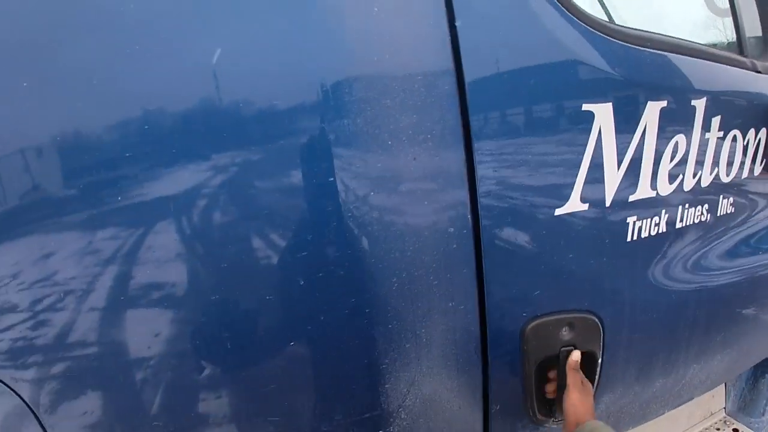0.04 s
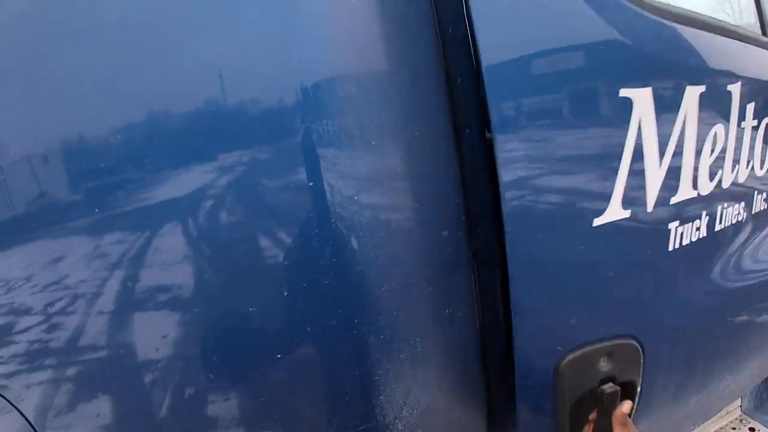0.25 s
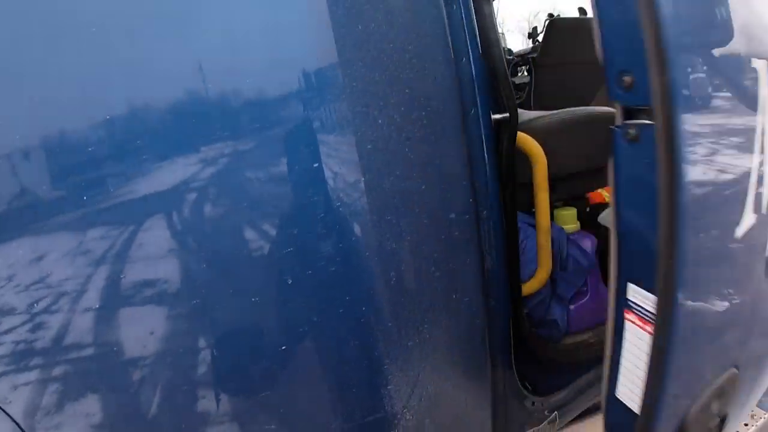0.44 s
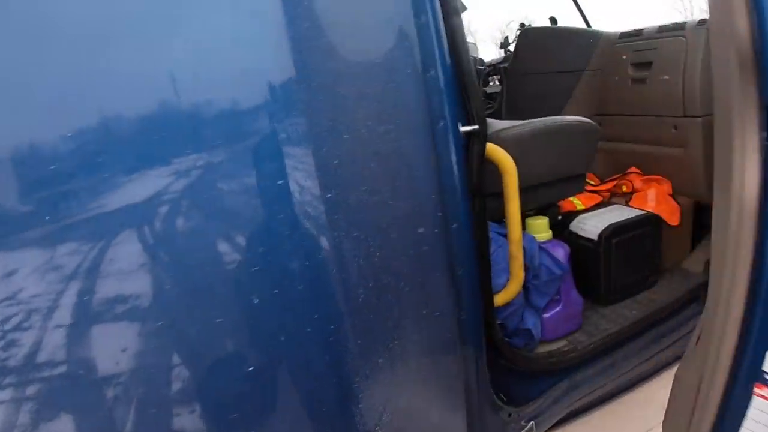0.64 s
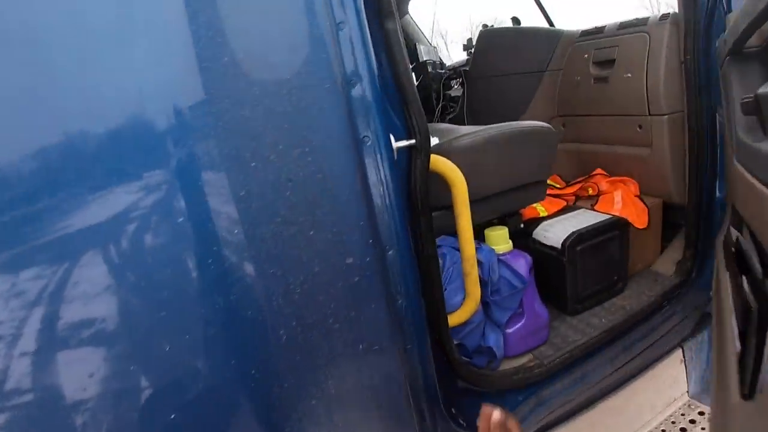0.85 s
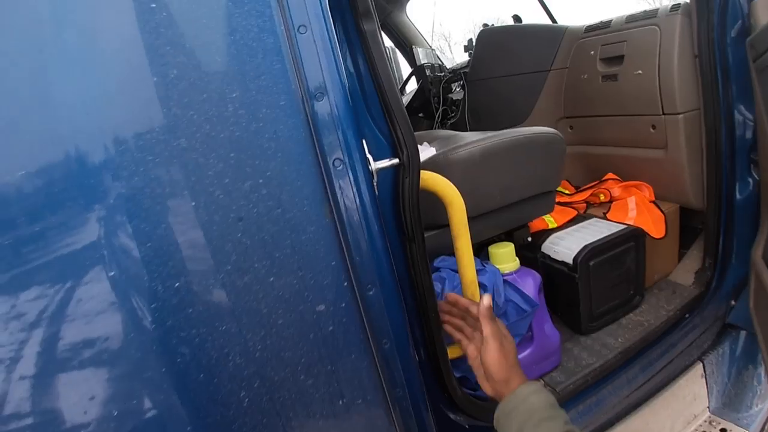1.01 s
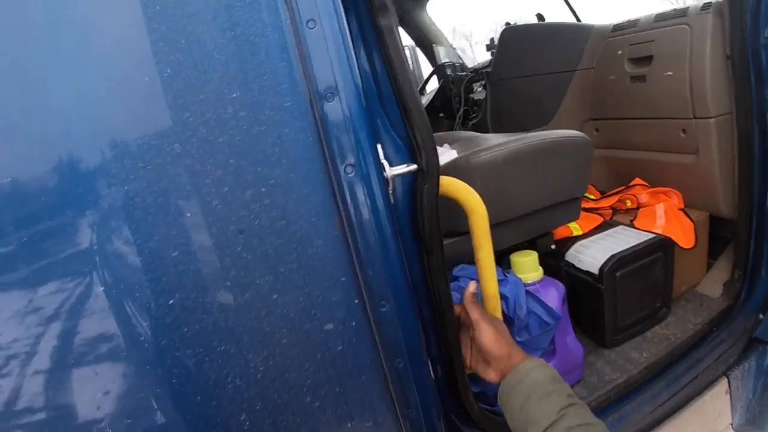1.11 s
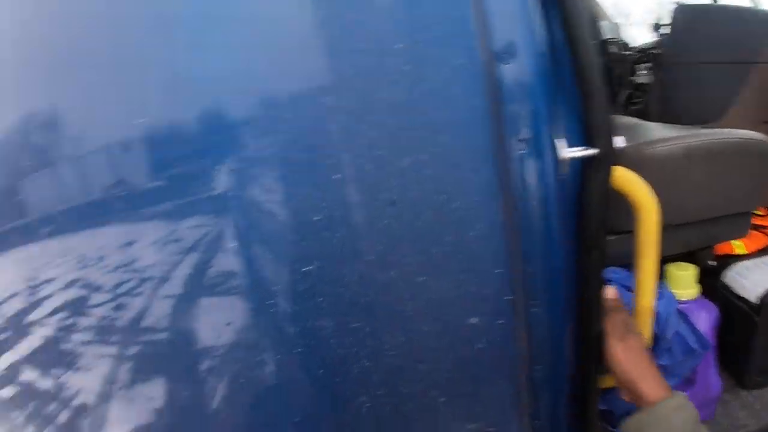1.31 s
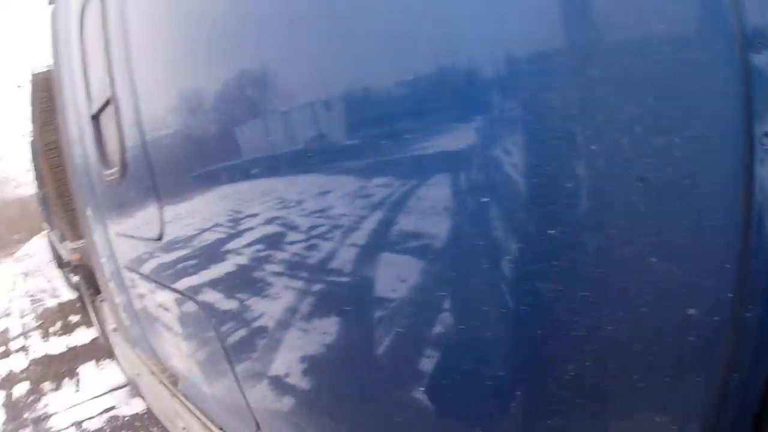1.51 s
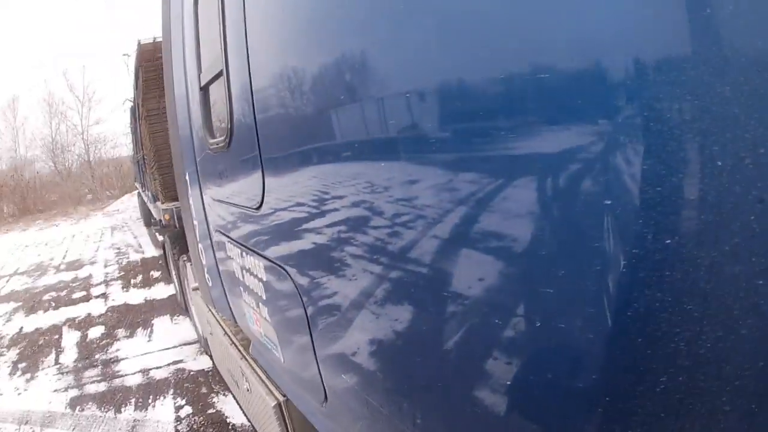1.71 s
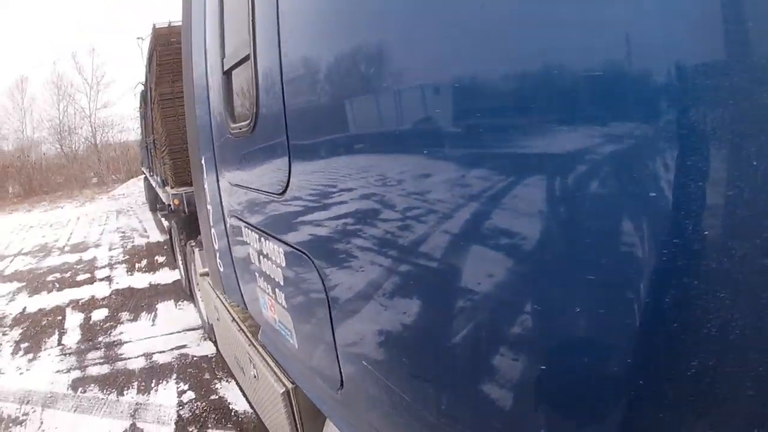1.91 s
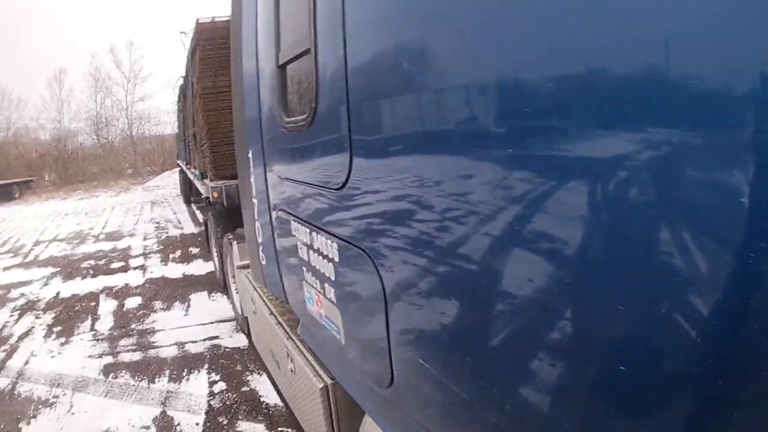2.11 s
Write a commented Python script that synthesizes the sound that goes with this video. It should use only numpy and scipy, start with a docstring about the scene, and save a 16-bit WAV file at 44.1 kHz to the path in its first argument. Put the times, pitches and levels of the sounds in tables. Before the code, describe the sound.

A truck cab door opens close to the microphone: brief handle squeak, heavy latch clunk, bright metallic clack, then wind thumps, a steel snap, and hand and sleeve bumps, over a diesel idling outdoors.

```python
"""A diesel engine idles under soft wind, then a truck's cab door is opened by hand at an arm's length.
The handle squeaks, the latch lets go with a clunk, and the door clacks as it swings out.
Air buffets the microphone; then a hand and sleeve knock and brush along the cab.
Engine hum is sines; wind, cloth, squeaks and clatter are shaped noise; blows and snaps are
fading sines, one for each way a part can ring."""
import sys
import numpy as np
from scipy import signal
from scipy.fft import rfft, irfft
from scipy.io import wavfile

SR = 44100
rng = np.random.default_rng(int(sys.argv[2]) if len(sys.argv) > 2 else 0)


def digitize_waveform(pressure):
    """Quantize a signal to 16-bit integers and store it at the path in sys.argv[1].

    Rows of a 2-D input are taken as channels; values are limited to [-1, 1].
    """
    field = np.atleast_2d(pressure).T
    bounded = np.clip(field, -1, 1)
    quanta = np.round(bounded * 32767).astype(np.int16)
    wavfile.write(sys.argv[1], SR, quanta)


N = 94815
TIME = np.arange(N) / SR

# In these tables t60 is the time to fade by 60 dB, and a spectrum gives only relative levels.
# Door, fitting, squeak and hand levels are those before the microphone colour.

# engine hum: f/Hz, level/dB
ENGINE_HUM = [(42.6, -38.5), (60, -51), (66.4, -37.5), (76.2, -37), (85.6, -45), (157, -51.5)]
# spectrum of engine clatter and yard: f/Hz, level/dB
IDLE_SPECTRUM = [(60, -14), (120, 4.5), (250, 1.5), (400, -3), (600, -5.5), (1220, -7.5), (2300, -17),
                 (3100, -17), (4500, -29), (7500, -32), (9200, -51), (12000, -60), (15000, -82)]
# its loudness, which rises as the microphone turns along the cab: t/s, level/dB
IDLE_LEVEL = [(0, -46), (.3, -45.5), (.8, -48), (1.1, -45.5), (1.4, -42), (1.75, -42.5), (2.15, -39)]
FIRING_HZ, FIRING_DEPTH = 33.2, 0.11  # throb rate, and its depth as a share of the noise

# wind loudness: t/s, level/dB
WIND_LEVEL = [(0, -37.5), (.57, -38.5), (.63, -30.5), (.70, -38), (.85, -42), (.92, -22.5), (.98, -34),
              (1.06, -30), (1.13, -23), (1.22, -33), (1.42, -40.5), (1.49, -29), (1.65, -37), (2.15, -47.5)]
# wind spectrum: f/Hz, level/dB
WIND_SPECTRUM = [(5, -30), (18, -5), (45, 1), (95, 2), (180, -11.5), (350, -27), (900, -52), (3000, -84)]
# gusts thumping the microphone: middle t/s, level/dB before the pulse shape, length/s
GUST_THUMPS = [(0.873, -25, 0.0045), (0.91, -17.5, 0.0032), (0.937, -14, 0.0026), (1.03, -23, 0.01),
               (1.054, -16.5, 0.003), (1.11, -23, 0.0054)]

# sleeve rubbing loudness: t/s, level/dB
SLEEVE_LEVEL = [(0, -55.5), (.33, -68), (.40, -49.5), (.50, -64), (.61, -50), (.67, -61), (.76, -52.5),
                (.85, -54), (.875, -45.5), (.90, -62), (.94, -50.5), (.98, -58.5), (1.125, -55),
                (1.145, -35), (1.19, -36.5), (1.27, -47.5), (1.35, -34.5), (1.42, -51.5), (1.485, -28),
                (1.51, -38.5), (1.59, -47.5), (1.62, -68), (2.15, -57.5)]
# sleeve rubbing spectrum: f/Hz, level/dB
SLEEVE_SPECTRUM = [(150, -10), (600, 3), (1500, -2), (3000, -3.5), (5500, -4), (7800, -2.5), (15000, -16.5)]
SLEEVE_GRAIN_DB = 1.5  # typical (rms) flutter of the hiss
CRACKLE_PER_S, CRACKLE_DB = 450, -8  # tiny stick-slip catches in the fabric; level beside the hiss

# resonances of the handle pivot: f/Hz, width/Hz, level/dB (relative)
HANDLE_RESONANCES = [(805, 50, -5.5), (3220, 300, -9.5), (4010, 110, -2.5), (5230, 230, -1.5),
                     (6600, 1200, -4.5), (7300, 550, 0), (7400, 650, -8)]
# squeaks of the handle: t/s, rise/s, hold/s, t60/s, level/dB
HANDLE_SQUEAKS = [(0.096, 0.0039, .012, .028, -23.5)]
# resonances of the door seal: f/Hz, width/Hz, level/dB (relative)
SEAL_RESONANCES = [(1250, 150, -3), (1520, 120, 6), (3000, 980, -9)]
# the seal squeaks faintly as it peels away: t/s, rise/s, hold/s, t60/s, level/dB
SEAL_SQUEAKS = [(0.384, 0.0047, 0.031, .05, -43)]

# blows on the door: t/s, level/dB, centre of the modes it excites f/Hz, spread/octaves,
# t60 scale (no unit; less while the hand damps the door)
DOOR_BLOWS = [(.112, -30, 780, 0.17, 1.66), (.182, -11, 343, 0.65, 0.31), (.189, -15, 700, 0.48, 0.78),
              (.197, -11.5, 79.6, 0.93, 1.26), (.230, -22.5, 75, 0.87, 0.72), (.4405, -17, 280, 1.22, 1.03),
              (.443, -23, 2300, 0.4, 0.99), (.457, -18, 112, 0.24, 1.04)]
# door panel modes: f/Hz, level/dB added to the blow's, t60/s before the blow's scale
DOOR_MODES = [(67, 8, 0.084), (102.2, 2, 0.16), (120.2, -3, 0.21), (157, -4, 0.066), (234, 3.5, 0.134),
              (333, -1, 0.112), (404, -3, 0.1), (523, -1.5, 0.096), (579, -4, 0.11), (750, -26, 0.066),
              (800, 4.5, 0.071), (1000, -23, .08), (1780, 8, 0.042), (2080, -0.5, 0.066), (2770, 0, 0.054)]
# clatter of latch and linkage: t/s, rise/s, hold/s, t60 scale (no unit),
# then level/dB at each of KNOCK_HZ
LATCH_CLATTER = [(0.112, 0.0016, 0.0014, 0.81, -29.5, -36, -32.5, -34.5, -27.5),
                 (0.157, 0.0016, 0.0041, 1, -28, -36, -37, -42, -42),
                 (.167, .003, .012, 0.43, -33, -21.5, -45, -58, -56),
                 (0.179, 0.0032, 0.0051, 0.89, -15, -25, -24.5, -35, -38.5),
                 (0.217, 0.0022, 0.0044, 1.6, -33, -28.5, -55, -49, -48.5),
                 (0.232, 0.0027, 0.0067, 1.4, -31.5, -39, -53, -57, -55),
                 (.340, 0.0027, 0.0056, 1.5, -43, -46, -38.5, -44, -57),
                 (0.4284, 0.0008, 0.0016, 0.66, -50, -36, -42, -38, -42),
                 (.438, 0.00083, 0.0064, 0.61, -14, -19, -26, -24.5, -29.5),
                 (0.456, 0.00082, 0.002, 1.38, -20, -42, -40, -43, -54),
                 (0.522, .001, 0.0018, 0.41, -39.5, -65, -59, -58, -50)]
# where the knock levels are given: f/Hz
KNOCK_HZ = [250, 700, 1500, 4000, 7500]
# how long a knock rings: f/Hz, t60/s before the knock's scale
KNOCK_RING = [(150, 0.14), (600, 0.1), (1800, 0.077), (7000, 0.049)]
TOP_DB = -15  # change in a knock from the highest of KNOCK_HZ up to EDGE_HZ

# snaps of steel fittings: t/s, level/dB, ring f/Hz, t60/s
STEEL_SNAPS = [(.147, -40, 4800, 0.012), (0.3422, -32.5, 1490, 0.026), (.347, -30.5, 1303, 0.033),
               (.4298, -35, 3300, .012), (0.4386, -13, 4690, 0.017), (.4545, -32, 5030, .015),
               (.522, -40.5, 3000, 0.0086), (1.2222, -20, 3520, 0.068), (1.226, -31.5, 2210, 0.037),
               (1.2305, -22.5, 3416, 0.044), (1.925, -32.5, 1840, 0.033)]
# modes of such a fitting: multiple of its ring f (no unit), level/dB added to the snap's
FITTING_MODES = [(.41, -8.5), (0.598, -7.5), (.915, -7.5), (.99, -3), (1.026, -5), (1.069, -13.5),
                 (1.21, -10), (1.3, -9), (1.499, -13.5)]

# bumps of the hand against the cab: t/s, rise/s, hold/s, t60 scale (no unit), ring f/Hz,
# ring level/dB, then level/dB at each of KNOCK_HZ
HAND_BUMPS = [(1.135, 0.0088, 0.0029, 1.67, 153.7, -11, -26.5, -34.5, -30.5, -34.5, -43),
              (1.222, 0.0028, 0.0069, 1.12, 148, -16.5, -33, -41.5, -30, -33.5, -32),
              (1.380, 0.0041, 0.0078, 1.2, 195, -35, -35.5, -48, -59, -66, -54),
              (1.496, 0.0035, 0.0059, 0.87, 170, -18, -17, -30.5, -37.5, -40, -59),
              (1.514, 0.0012, .003, 0.52, 336, -24, -28, -34.5, -35, -37.5, -50),
              (1.522, 0.0011, .008, 0.86, 401, -29, -32, -39.5, -37, -40, -46),
              (1.55, 0.002, 0.0051, 1, 212, -28, -29, -44, -43, -62, -50),
              (1.572, 0.0038, 0.0064, 1.33, 301, -26, -45, -43, -40.5, -50, -67),
              (1.634, 0.0062, 0.0065, 1.3, 216.7, -18, -25.5, -31.5, -33, -40.5, -42),
              (1.924, 0.003, .006, 1.5, 263.6, -35.5, -40, -45, -39.5, -53.5, -54)]
BUMP_T60_S = 0.15  # hollow ring, before the bump's t60 scale

# microphone colour: f/Hz, level/dB
MIC_COLOUR = [(20, -4.5), (7900, -4.5), (8500, -10.5), (9200, -13.5), (12000, -17), (14200, -20),
              (15200, -38)]
EDGE_HZ = 15100  # upper limit of the recorder


def amp(db):
    """Turns decibels into a multiplier."""
    return 10 ** (np.asarray(db) / 20)


def unit(x):
    """Scales a sound to an rms (average strength) of 1."""
    return x / np.sqrt(np.mean(x ** 2) + 1e-20)


def read(points, hz):
    """Reads between table points, with pitch spaced as the ear hears it (log frequency)."""
    f, value = np.transpose(points)
    return np.interp(np.log(hz + 1), np.log(f + 1), value)


def level(points):
    """Draws a loudness curve over time, straight in dB between its points."""
    return amp(np.interp(TIME, *np.transpose(points)))


def colour(x, points):
    """Makes each frequency louder or softer by a dB curve."""
    f = np.fft.rfftfreq(2 * N, 1 / SR)
    spectrum = rfft(x, 2 * N)  # zero padding keeps the end from wrapping to the start
    return irfft(spectrum * amp(read(points, f)))[:N]


def drift(hz):
    """Random wandering of rms 1, smooth because it fades out above about hz."""
    f = np.fft.rfftfreq(N, 1 / SR)
    keep = np.exp(-(f / hz) ** 2) * (f > 0)
    return unit(irfft(rfft(rng.standard_normal(N)) * keep, N))


def envelope(start, rise, hold, t60):
    """Straight rise, steady hold, then a fade like that of a ringing object."""
    t = TIME - start
    attack = np.clip(t / max(rise, 1e-4), 0, 1)
    fade = np.exp(-np.log(1000) * np.clip((t - rise - hold) / t60, 0, 10))
    return attack * fade


def mode(start, hz, t60):
    """One way a struck object rings: a sine that dies away."""
    t = np.maximum(TIME - start, 0)
    return np.sin(2 * np.pi * hz * t) * np.exp(-np.log(1000) * np.minimum(t / t60, 10))


def engine():
    """Hum of slightly wavering sines, under noise that throbs with the firing."""
    hum = 0
    for hz, db in ENGINE_HUM:
        turns = hz * TIME + rng.random()
        hum += amp(db) * np.sin(2 * np.pi * turns + 0.18 * drift(hz=2.7))
    throb = 1 + FIRING_DEPTH * np.sin(2 * np.pi * FIRING_HZ * TIME + 0.92 * drift(hz=5.6))
    clatter = unit(colour(rng.standard_normal(N), IDLE_SPECTRUM))
    return hum + clatter * throb * level(IDLE_LEVEL)


def wind():
    """Low buffeting noise with a few sharp swings of air pressure."""
    out = unit(colour(rng.standard_normal(N), WIND_SPECTRUM)) * level(WIND_LEVEL)
    for middle, db, length in GUST_THUMPS:
        u = (TIME - middle) / length
        out += amp(db) * 2 * u / (1 + u * u) ** 2  # pressure dips, then swings up
    return out


def sleeve():
    """Cloth rubs as grainy hiss, with crackles where its fibres stick and slip."""
    hiss = amp(SLEEVE_GRAIN_DB * drift(hz=400)) * rng.standard_normal(N)
    catches = (rng.random(N) < CRACKLE_PER_S / SR) * rng.standard_normal(N)
    cloth = hiss + amp(CRACKLE_DB) * unit(catches)
    return unit(colour(cloth, SLEEVE_SPECTRUM)) * level(SLEEVE_LEVEL)


def squeak(resonances, events):
    """Brief rubbing, as noise, sounds through the resonances of a small part."""
    f = np.fft.rfftfreq(N, 1 / SR)
    power = 0
    for hz, width, db in resonances:
        detuning = (f * f - hz * hz) / ((f + 1) * width)
        power = power + amp(db) ** 2 / (1 + detuning ** 2)
    rub = unit(irfft(rfft(rng.standard_normal(N)) * np.sqrt(power), N))
    return rub * sum(amp(db) * envelope(*shape) for *shape, db in events)


def dense_modes():
    """Half-octave bands of even noise stand for modes too crowded to list: (Hz, sound)."""
    f = np.fft.rfftfreq(N, 1 / SR)
    bands = []
    for hz in np.geomspace(160, 14500, 14):
        in_band = abs(np.log2((f + 1) / hz)) < .27
        z = np.fft.ifft(rfft(rng.standard_normal(N)) * in_band, N)
        even = z.real / np.sqrt(abs(z))  # evens out the noise's own swells
        bands.append((hz, unit(even) / np.sqrt(2)))  # as strong as a sine of height 1
    return bands


def knock(bands, start, rise, hold, ring, band_db):
    """A short contact excites the crowded modes; the treble dies first."""
    tone = list(zip(KNOCK_HZ, band_db)) + [(EDGE_HZ, band_db[-1] + TOP_DB)]
    out = 0
    for hz, noise in bands:
        t60 = ring * read(KNOCK_RING, hz)
        out += noise * amp(read(tone, hz)) * envelope(start, rise, hold, t60)
    return out


def door(bands):
    """The panel booms under each blow, loudest in modes near its centre; the latch clatters."""
    out = sum(knock(bands, *row[:4], row[4:]) for row in LATCH_CLATTER)
    for start, db, centre_hz, spread, ring in DOOR_BLOWS:
        for hz, mode_db, t60 in DOOR_MODES:
            octaves_off = np.log2(hz / centre_hz)
            share = np.exp(-.5 * (octaves_off / spread) ** 2)
            out += amp(db + mode_db) * share * mode(start, hz, t60 * ring)
    return out


def fittings():
    """Small steel parts snap and ring briefly, each in several modes at once."""
    out = 0
    for start, db, hz, t60 in STEEL_SNAPS:
        for ratio, mode_db in FITTING_MODES:
            out += amp(db + mode_db) * mode(start, hz * ratio, t60)
    return out


def hand_bumps(bands):
    """The hand bumps the cab: soft knocks, each with one hollow ring."""
    out = 0
    for start, rise, hold, ring, hz, db, *band_db in HAND_BUMPS:
        out += knock(bands, start, rise, hold, ring, band_db)
        out += amp(db) * mode(start + rise, hz, BUMP_T60_S * ring)
    return out


def scene():
    """Adds all sources; only the door, its parts, hand and sleeve get the microphone colour."""
    bands = dense_modes()
    squeaks = squeak(HANDLE_RESONANCES, HANDLE_SQUEAKS) + squeak(SEAL_RESONANCES, SEAL_SQUEAKS)
    near = sleeve() + squeaks + door(bands) + fittings() + hand_bumps(bands)
    return (engine() + wind() + colour(near, MIC_COLOUR))[None]


def record(dry):
    """The recorder cuts the deepest bass and the treble above its upper limit."""
    bass_cut = signal.butter(1, 8, "high", fs=SR, output="sos")
    dry = signal.sosfilt(bass_cut, dry)
    treble_cut = signal.firwin(511, EDGE_HZ, window=("kaiser", 9), fs=SR)
    return signal.oaconvolve(dry, treble_cut[None], "same")


dry = scene()
out = record(dry)
digitize_waveform(out)
```